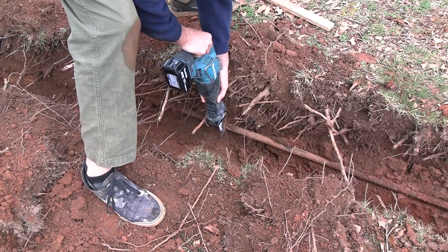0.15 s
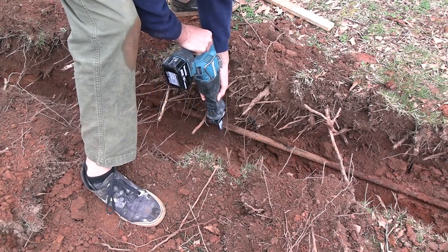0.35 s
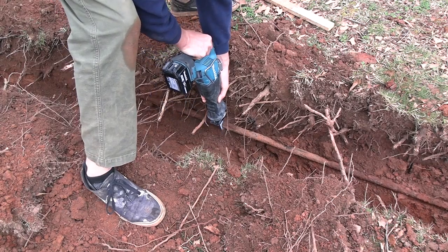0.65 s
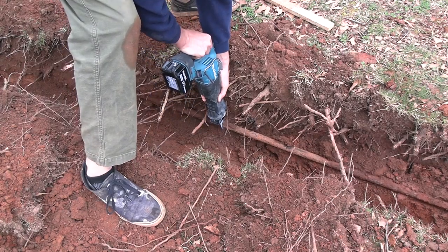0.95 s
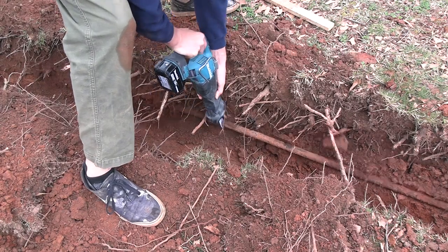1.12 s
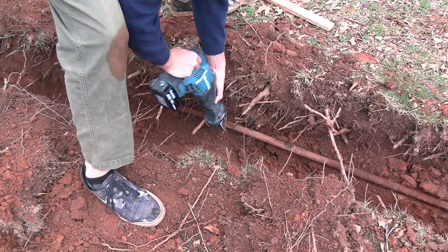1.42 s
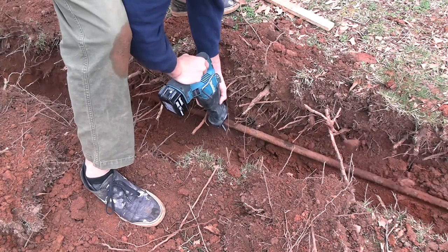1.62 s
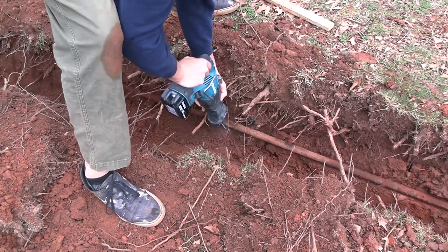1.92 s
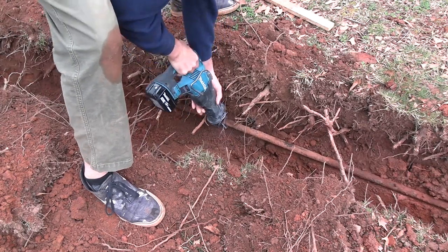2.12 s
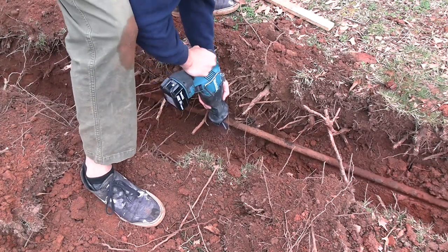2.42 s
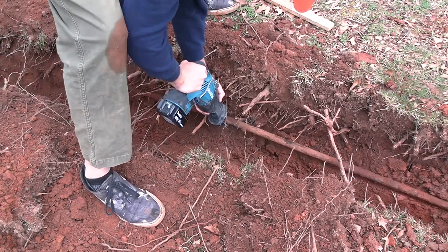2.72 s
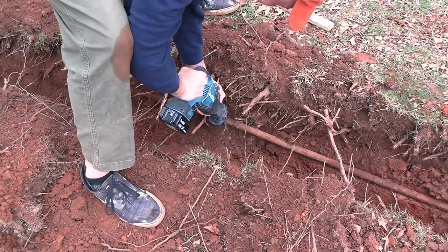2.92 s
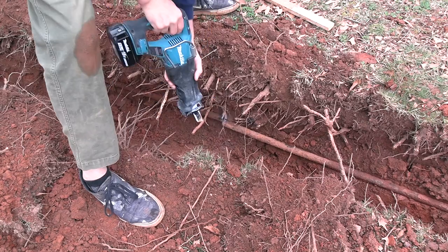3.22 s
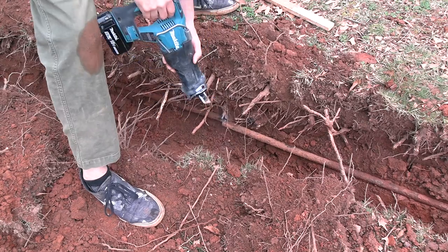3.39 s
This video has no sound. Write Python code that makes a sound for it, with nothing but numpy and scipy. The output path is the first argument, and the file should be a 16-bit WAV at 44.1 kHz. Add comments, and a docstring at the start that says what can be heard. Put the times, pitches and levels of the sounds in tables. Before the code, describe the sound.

Close, dry outdoor sound of a reciprocating saw: bright gear whirr, grating metal bite with pipe knocks, short gap, second cutting burst, then a sudden low rumble, steady hum and quick songbird chirps.

```python
"""Close to a cordless reciprocating saw in an earth trench: it runs almost free, then bites into a copper pipe and slows.
It stops briefly, starts again and cuts through. One crank drives gear noise, low hum orders, filtered bursts
at each blade reversal and grainy tooth noise with squeals; the pipe's knocks are short decaying sines.
At the end a low outdoor rumble with a steady hum and a songbird's gliding whistles comes in abruptly."""
import sys
import numpy as np
from scipy import signal
from scipy.fft import rfft, irfft, next_fast_len
from scipy.io import wavfile
from scipy.ndimage import map_coordinates

SR = 44100
rng = np.random.default_rng(int(sys.argv[2]) if len(sys.argv) > 2 else 0)


def wrap_up_sound(samples):
    """Save the sound to the file named by the first command line argument, as 16-bit audio."""
    columns = np.atleast_2d(samples).T
    # keep every value between -1 and 1, then stretch to whole-number steps
    tamed = np.clip(columns, -1, 1)
    steps = np.round(tamed * 32767).astype(np.int16)
    wavfile.write(sys.argv[1], SR, steps)


N = 156555
T = np.arange(N) / SR

# bite of the teeth in the copper: time_s, level_db
BITE = [(1.0, -53), (1.15, -33), (1.3, -35.5), (1.34, -51), (1.39, -32), (2.57, -32.5), (2.63, -37.5),
        (2.77, -34), (2.98, -41), (3.12, -47)]
# hum orders of the reversal rate, from the second up: level_db (relative)
HUM_ORDERS = [-13, -7, 0, 1, -5, -6, -2, -2, 1, -2, -3]
# rattles: start_s, level_db (before a common gain); mostly the blade catching, the quiet one at 2.306 s the
# click of the trigger
RATTLE_TIMES = [(1.267, -23), (1.3937, -22), (1.4147, -23), (2.0188, -22), (2.3062, -38), (2.3481, -22),
                (2.373, -21), (2.5326, -22), (2.594, -23), (2.8574, -19)]


def from_db(db):
    """Decibels to amplitude gain."""
    return 10 ** (np.asarray(db) / 20)


def rms_one(x):
    """Scale to unit rms."""
    return x / np.sqrt(np.mean(x ** 2) + 1e-20)


def in_time(rows):
    """Straight lines between rows of (time, value), sample by sample."""
    return np.interp(T, *np.transpose(rows))


def drift(hz):
    """Smooth random wander with unit rms: noise through two equal one-pole lowpasses."""
    pole = np.exp(-2 * np.pi * hz / SR)
    noise = rng.standard_normal(N + SR)
    settled = signal.lfilter([1], [1, -2 * pole, pole * pole], noise)[SR:]
    return rms_one(settled)


def colour(x, points, keep_level=True):
    """Causal minimum-phase filter with the given spectrum, by default of unit power."""
    size = 2 * next_fast_len(N)
    hz, db = np.transpose(points)
    log_hz = np.log(np.fft.rfftfreq(size, 1 / SR) + 1)
    gain = from_db(np.interp(log_hz, np.log(hz), db))
    if keep_level:
        gain = rms_one(gain)
    # folding the cepstrum onto positive time gives the minimum phase
    cepstrum = irfft(np.log(gain))
    cepstrum[1:size // 2] *= 2
    cepstrum[size // 2 + 1:] = 0
    return irfft(rfft(x, size) * np.exp(rfft(cepstrum)))[..., :N]


def grit(grain_db, grain_hz, reversals=0, repeat=0):
    """Clumps of tiny contacts, as middle and side; a share of their power recurs at the same point of every
    reversal."""
    size = 400  # points of the recurring pattern, one reversal long
    phases = np.exp(2j * np.pi * rng.random((2, size // 2 + 1)))
    above_hum = np.arange(size // 2 + 1) > len(HUM_ORDERS)
    patterns = rms_one(irfft(phases * above_hum))
    place = [np.zeros(N) + reversals * size]
    recurring = np.array([map_coordinates(p, place, order=3, mode="grid-wrap") for p in patterns])
    fresh = rng.standard_normal((2, N))
    contacts = np.sqrt(repeat) * recurring + np.sqrt(1 - repeat) * fresh
    return rms_one(contacts * from_db(grain_db * drift(grain_hz)))


def strikes(rows):
    """One click per row of (start_s, level_db)."""
    start_s, level_db = np.transpose(rows)
    return np.bincount((start_s * SR).astype(int), from_db(level_db), N)[:N] + 1e-18


def echo(x, db, t60_s):
    """Diffuse reflections: convolution with a decaying noise tail of unit energy."""
    tail = rng.standard_normal(N) * from_db(-60 * T / t60_s)
    return from_db(db) * signal.fftconvolve(x, tail / np.linalg.norm(tail))[:N]


def bird():
    """Slurred whistles: gliding sines with a slight waver, nearer the left, and a diffuse outdoor echo."""
    # bird notes: start_s, length_s, first_hz, middle_hz, last_hz, level_db (before panning)
    notes = [(3.287, 0.036, 2090, 2503, 2560, -41), (3.324, 0.0297, 3230, 2585, 2310, -39),
             (3.379, 0.049, 3350, 3580, 4280, -41), (3.422, 0.02, 3450, 3040, 2000, -37),
             (3.439, 0.038, 2160, 1955, 2000, -45), (3.522, 0.048, 1840, 2600, 2670, -39.5)]
    pan_db, waver_hz = 4.5, 40
    song = np.zeros(N)
    for start_s, length_s, first_hz, middle_hz, last_hz, level_db in notes:
        u = np.clip((T - start_s) / length_s, 0, 1)
        glide = np.polyfit([0, .5, 1], [first_hz, middle_hz, last_hz], 2)
        pitch_hz = np.polyval(glide, u) + waver_hz * drift(hz=40)
        whistle = np.sin(2 * np.pi * np.cumsum(pitch_hz) / SR)
        song += from_db(level_db) * np.sqrt(2) * np.sin(np.pi * u) * whistle
    echoes = [echo(song, db=1.5, t60_s=0.55) for _ in range(2)]
    return song * from_db([[pan_db], [-pan_db]]) + echoes


def background():
    """Quiet air noise; then, abruptly, a louder outdoor rumble with a steady sine hum and a bird."""
    # spectrum of the quiet air: frequency_hz, level_db (relative)
    air_colour = [(30, -21), (900, 0), (15000, -20)]
    # spectrum of the outdoor rumble: frequency_hz, level_db (relative)
    yard_colour = [(30, -33), (52, 0.5), (700, -2.5), (1100, -10), (2500, -9), (4500, -20), (14000, -44)]
    air_db, yard_db, hum_db = -64.5, -46, -49.5
    hum_hz, change_s = 106.8, 3.186
    air = from_db(air_db) * colour(rng.standard_normal(N), air_colour)
    yard = from_db(yard_db) * colour(rng.standard_normal(N), yard_colour)
    hum = from_db(hum_db) * np.sqrt(2) * np.sin(2 * np.pi * hum_hz * T)
    return air + (yard + hum + bird()) * np.clip((T - change_s) / 0.0008, 0, 1)


def running():
    """Gain of the mechanism: rises quickly to each run and dies as the brake acts."""
    # the motor is driven: start_s, end_s
    trigger = [(0, 2.047), (2.349, 3.111)]
    start_db_per_s, brake_db_per_s = 658, 881
    runs_db = []
    for on_s, off_s in trigger:
        slope_db = np.minimum((T - on_s) * start_db_per_s, (off_s - T) * brake_db_per_s)
        runs_db.append(np.minimum(0, slope_db))
    return from_db(np.max(runs_db, axis=0))


def knocks(reversals):
    """The pipe judders once a stroke and often knocks hard on the shoe; soil-damped modes ring, detuned each time."""
    # hard knocks: start_s, level_db (before the common gain)
    hard = [(1.166, -26.5), (1.212, -23.5), (1.237, -24.5), (1.292, -21.5), (1.334, -20), (1.416, -17.5),
            (1.476, -21.5), (1.526, -26), (1.596, -24.5), (1.622, -25.5), (1.644, -24), (1.716, -23),
            (1.786, -23), (1.798, -21), (1.81, -23), (1.907, -24.5), (1.955, -27), (1.978, -24.5),
            (2.375, -24.5), (2.4, -23.5), (2.447, -22)]
    # ringing modes of a knock: frequency_hz (before detuning), level_db (relative), t60_s
    modes = [(340, -14, 0.0054), (525, -4, 0.0083), (820, -8, 0.0069)]
    gain_db, detune_octaves = 3.5, 0.15
    judder_db, scatter_db, jitter_s = 3, 2, 0.002  # judder_db is against the bite, before the common gain
    at = np.flatnonzero(np.diff(np.floor(reversals / 2)) * (running()[1:] > .5))
    judder = np.transpose([T[at], in_time(BITE)[at] + judder_db])
    judder = judder + rng.standard_normal((len(at), 2)) * [jitter_s, scatter_db]

    hz, mode_db, t60_s = np.transpose(modes)[:, :, None]
    out, t = np.zeros(N + SR), T[:SR // 20]
    for start_s, level_db in np.vstack([hard, judder]):
        detuned_hz = hz * 2 ** (detune_octaves * rng.standard_normal((len(hz), 1)))
        decay = from_db(gain_db + level_db + mode_db - 60 * t / t60_s)
        rings = decay * np.sin(2 * np.pi * detuned_hz * t)
        start = max(int(start_s * SR), 0)
        out[start:start + len(t)] += rings.sum(axis=0)
    band = signal.butter(N=4, Wn=(258, 1025), btype="band", fs=SR, output="sos")
    return signal.sosfilt(band, out[:N] + 1e-18)


def rattles():
    """Brief decaying bursts of band-limited noise, a metallic rattle: mostly the blade catching and tearing
    free, once the click of the trigger."""
    fall_s, gain_db = 0.0026, -4.5
    burst = signal.lfilter([1], [1, -np.exp(-1 / (fall_s * SR))], strikes(RATTLE_TIMES))
    band = signal.butter(2, (1300, 3600), "band", fs=SR, output="sos")
    contacts = rng.standard_normal(N)
    rattle = signal.sosfilt(band, burst * contacts)
    return from_db(gain_db) * rattle / np.std(signal.sosfilt(band, contacts))


def crank(reversals):
    """Hum of the crank: clean low orders of the reversal rate, louder and duller under load."""
    # hum of the crank: time_s, level_db
    hum_level = [(2.62, -53.5), (2.69, -38), (2.78, -40.5), (2.81, -49), (2.97, -46), (3.1, -60)]
    dulling = 0.06  # dB lost per order for each dB of swell
    flicker_db = 1.5
    level_db = in_time(hum_level)
    dulling_db = dulling * np.maximum(level_db - level_db[0], 0)
    tone = np.zeros(N)
    for k, order_db in enumerate(HUM_ORDERS):
        gain = from_db(order_db - k * dulling_db + flicker_db * drift(hz=1.14))
        tone += gain * np.sin(2 * np.pi * ((k + 2) * reversals + rng.random()))
    return rms_one(tone) * from_db(level_db)


def whirr(reversals):
    """Noise of motor and gears swells twice a stroke and rings the gear case at its resonances."""
    # whirr of motor and gears: time_s, level_db (before the case rings)
    gear_level = [(0, -32), (1.08, -31.5), (1.17, -40.5), (1.33, -45.5), (1.39, -43), (2.62, -42),
                  (3.1, -37.5)]
    # spectrum of the gears: frequency_hz, level_db (relative)
    gear_colour = [(100, -35), (400, -36.5), (1450, -10), (1900, 0.06), (5800, -1), (7800, 2), (9300, 3),
                   (11000, -1), (16000, -3)]
    # gear case resonances: frequency_hz, width_hz, level_db
    case_modes = [(2532, 19, 4.5), (5130, 16, 7)]
    pulse_db, peak_turn = 2, 0.074  # peak_turn is a fraction of one reversal
    swell = rms_one(from_db(pulse_db * np.cos(2 * np.pi * (reversals - peak_turn))))
    grains = grit(0.94, 480, reversals, repeat=0.45)
    gears = colour(grains * swell * from_db(in_time(gear_level)), gear_colour)
    case = np.zeros_like(gears)
    for hz, width_hz, db in case_modes:
        case += from_db(db) * signal.lfilter(*signal.iirpeak(hz, hz / width_hz, fs=SR), gears)
    return gears + case


def clacks(reversals, speed_hz):
    """A short metallic rattle at each blade reversal: noise under a fast rise and fall."""
    # force of the reversals: time_s, level_db
    force = [(1.02, -74), (1.29, -34.5), (1.335, -42.5), (1.38, -37), (2.58, -38), (2.64, -44.5),
             (2.74, -36), (2.97, -32.5), (3.05, -48.5)]
    # spectrum of a clack: frequency_hz, level_db (relative)
    clack_colour = [(350, -41.5), (800, -4.5), (1300, -10.5), (2000, 2), (2800, -6), (6300, -7), (8400, 6),
                    (9400, -3.5), (14000, -16.5)]
    rise_s, fall_s, scatter_db = 0.0005, 0.0014, 1.0
    nearest = np.round(reversals).astype(int)
    since_s = (reversals - nearest) / speed_hz
    burst = np.exp(-np.abs(since_s) / np.where(since_s < 0, rise_s, fall_s))
    burst = rms_one(burst * from_db(scatter_db * rng.standard_normal(N)[nearest]))
    grains = grit(1.5, 1000, reversals, repeat=0.35)
    return colour(grains * burst * from_db(in_time(force)), clack_colour)


def teeth(reversals):
    """Teeth tear at the pipe as grainy noise and set the blade squealing; the squeals bend as it sweeps."""
    # spectrum of the rasp: frequency_hz, level_db (relative)
    rasp_colour = [(100, -32.5), (400, -0.5), (800, 1), (1200, -3), (1950, 2), (2700, 0.5), (4000, 2),
                   (6500, -3), (8100, 5), (11000, -1.5), (12500, -5)]
    # blade squeals: pitch_hz, level_db (against the bite), swing_hz (shared by sweep and chance)
    squeals = [(10480, -9, 540), (3960, -14, 270)]
    pulse_db = 0  # swell of the rasp in mid-stroke: none, it stays even through the stroke
    jitter_hz, flicker_db = 257, 3.5
    bite = from_db(in_time(BITE))
    sweep = -np.cos(2 * np.pi * reversals)  # highest halfway between reversals
    pulse = rms_one(from_db(pulse_db * sweep))
    out = colour(grit(3.5, 257) * pulse * bite, rasp_colour)
    for hz, level_db, swing_hz in squeals:
        swing = swing_hz * (sweep + drift(hz=12)) / np.sqrt(2)
        pitch_hz = hz + swing + jitter_hz * drift(hz=700)
        squeal = np.sin(2 * np.pi * np.cumsum(pitch_hz) / SR)
        squeal = rms_one(squeal * from_db(flicker_db * drift(hz=69)))
        out[0] += bite * from_db(level_db) * squeal  # middle only
    return out


def scene():
    """One crank drives every part of the saw; its treble is wide, and the trench scatters a little to the sides."""
    # blade reversals, two a stroke: time_s, rate_hz
    reversal_rate = [(0.0, 110.5), (0.29, 114.7), (0.61, 110.3), (0.8, 112.1), (1.04, 107.2), (1.1, 101.6),
                     (1.17, 84.16), (2.05, 83.08), (2.57, 79.29), (2.63, 116.1), (2.7, 104), (2.79, 77),
                     (2.87, 89.08), (3.1, 80.9)]
    # gain of the side signal: frequency_hz, level_db
    width = [(3000, -38.5), (5000, -5.5), (7500, -4), (11000, -12.5)]
    treble_lean = -0.084  # the wide treble sits a little to the right
    speed_hz = in_time(reversal_rate)
    reversals = np.cumsum(speed_hz) / SR
    reversals -= np.interp(RATTLE_TIMES[-1][0], T, reversals) % 1  # the last rattle falls on a reversal
    mid, side = whirr(reversals) + clacks(reversals, speed_hz) + teeth(reversals)
    side = colour(side + treble_lean * mid, width, keep_level=False)
    saw = (np.array([mid + side, mid - side]) + crank(reversals)) * running()
    direct = saw + knocks(reversals) + rattles() + background()
    trench = echo(direct.mean(axis=0), db=-29.5, t60_s=0.06)
    return direct + trench * [[1], [-1]]  # opposite in the two channels


def record(dry):
    """Peaks are rounded by soft saturation and the top is cut steeply."""
    peak_limit, cutoff_hz = 0.24, 15900
    rounded = peak_limit * np.tanh(dry / peak_limit)
    return signal.sosfilt(signal.ellip(12, .1, 80, cutoff_hz, fs=SR, output="sos"), rounded)


dry = scene()
out = record(dry)
wrap_up_sound(out)
```